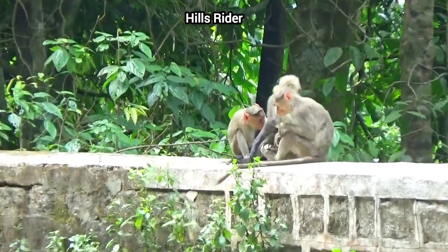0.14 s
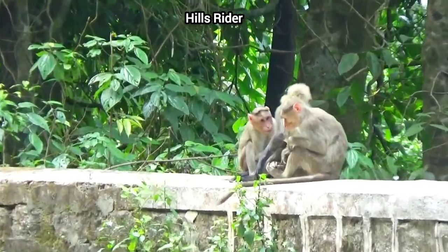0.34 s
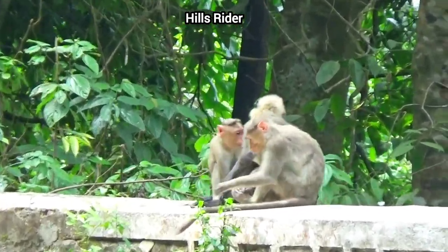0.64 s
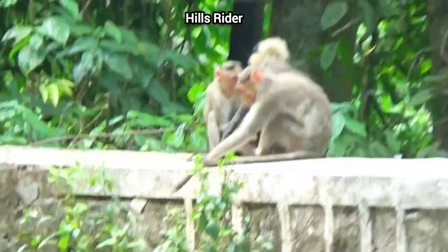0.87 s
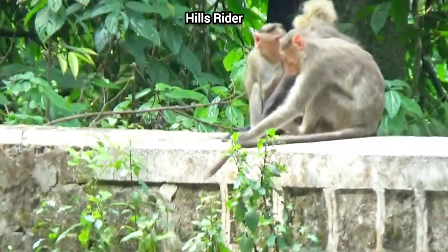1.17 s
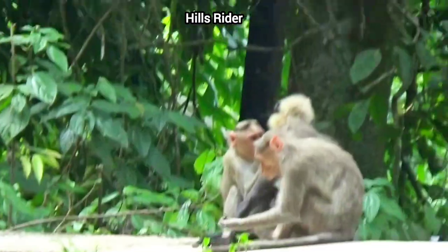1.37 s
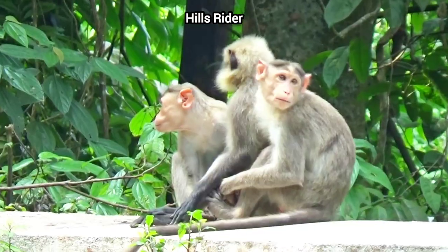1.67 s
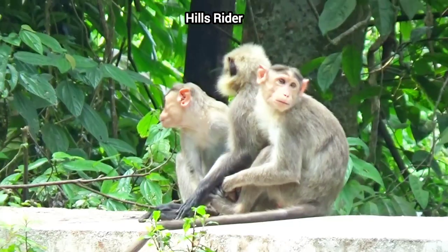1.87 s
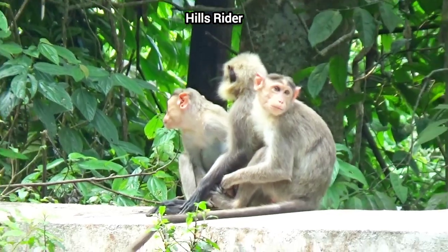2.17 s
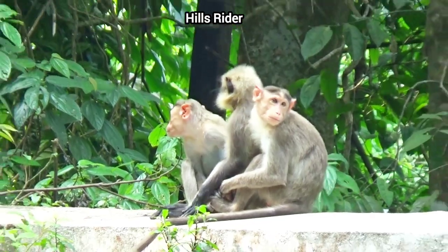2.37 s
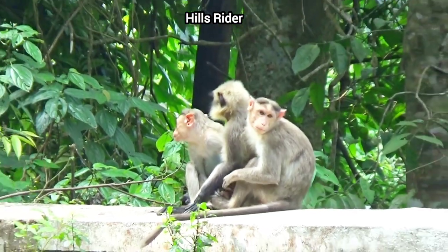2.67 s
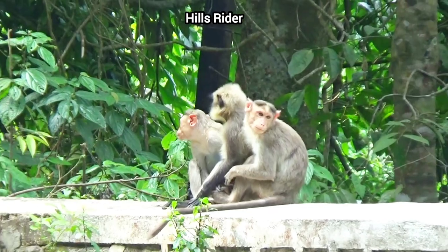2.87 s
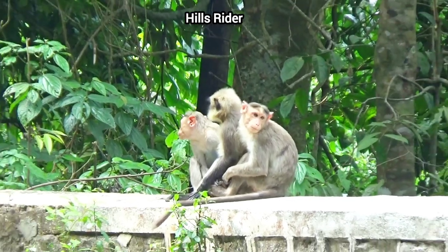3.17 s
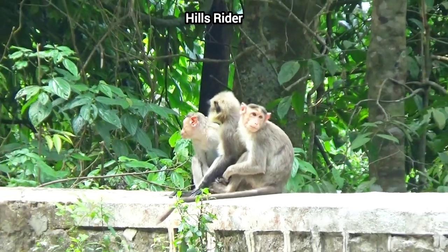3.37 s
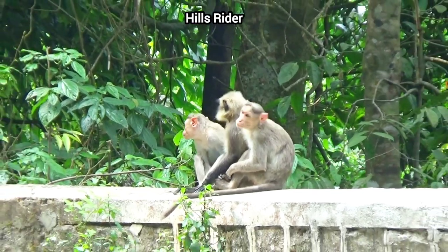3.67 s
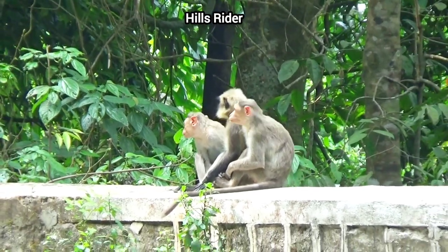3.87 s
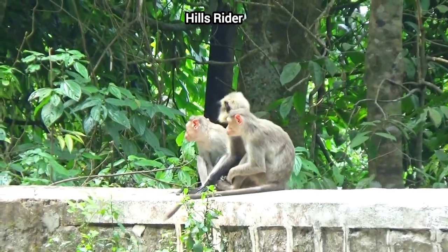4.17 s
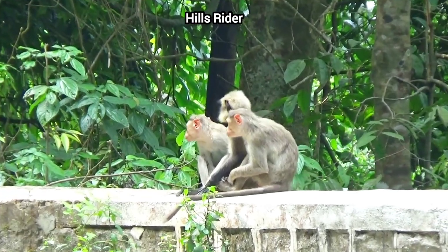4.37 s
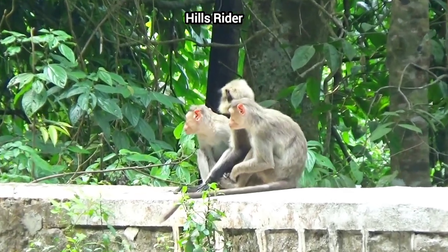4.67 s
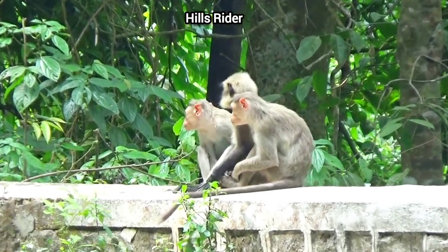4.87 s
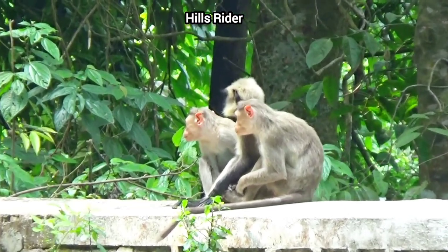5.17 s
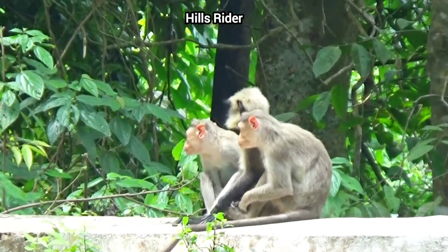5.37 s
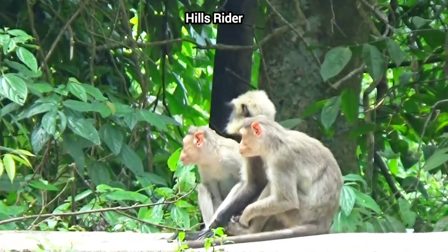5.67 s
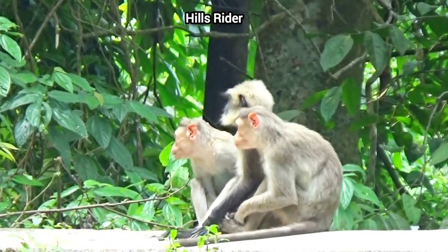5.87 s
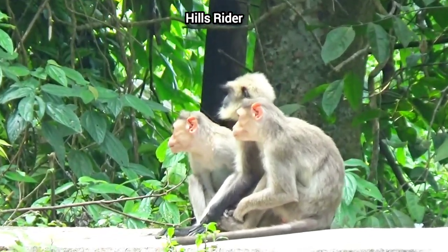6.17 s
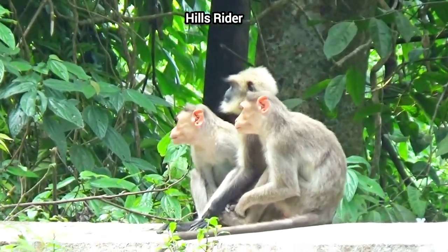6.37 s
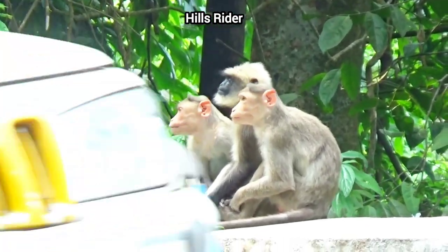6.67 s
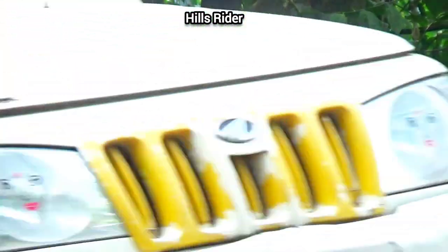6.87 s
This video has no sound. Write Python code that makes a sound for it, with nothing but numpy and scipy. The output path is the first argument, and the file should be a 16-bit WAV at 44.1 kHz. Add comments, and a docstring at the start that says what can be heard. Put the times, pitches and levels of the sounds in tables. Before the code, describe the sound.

Small ticks and rustles, then a loud raspy vehicle horn echoing off trees, faint distant blasts, and a rattling diesel engine growing until very near.

```python
"""A diesel pickup rolls slowly down a wooded hill road towards the listener and holds its twin horn once.
The horn is a stack of buzzing partials with a rasp of noise; delayed copies come back off trees and a wall,
lower in pitch from behind the moving truck. The engine is tones and noise that follow its firing rate.
A second vehicle further off gives two blasts, made of one steadier path and many echoes.
Close by, short rings and clicks make ticks and rustles, over a faint hiss of leaves and far road."""
import sys
import numpy as np
from scipy import signal
from scipy.io import wavfile

SR = 44100
rng = np.random.default_rng(int(sys.argv[2]) if len(sys.argv) > 2 else 0)


def transcribe(signal):
    """Save signal, clipped to [-1, 1], as a 16-bit WAV file at the path in sys.argv[1]."""
    frames = np.atleast_2d(signal).T
    limited = np.clip(frames, -1, 1)
    pcm = np.round(limited * 32767).astype(np.int16)
    wavfile.write(sys.argv[1], SR, pcm)


N = 309582
T = np.arange(N) / SR   # time in seconds
CUTOFF_HZ = 16300

# How much wider than central the noises are. Each row: frequency in Hz, side minus mid in dB.
SIDE_MINUS_MID = [(60, -13), (1000, -59), (4000, -23), (6500, -22), (9000, -13), (12000, 9)]

# Leaves and far road. Each row: frequency in Hz, relative level in dB per Hz.
WOOD_SPECTRUM = [(180, 14.5), (300, -15), (478, -19.5), (701, 25), (787, 5.5), (3300, -12), (4200, -11),
                 (8500, -14), (12000, -38), (16000, -41)]
WOOD_DB = -52.5
# A faint insect: pitch, middle of its moment, half length and level.
INSECT_HZ, INSECT_S, INSECT_WIDTH_S, INSECT_DB = 6700, 0.87, 0.29, -66.5

# Rustles close by. Each row: middle in seconds, half length in seconds, level in dB.
RUSTLES = [(0.05, 0.044, -54), (0.15, 0.034, -53), (0.226, 0.015, -67), (.56, 0.026, -58),
           (.65, 0.045, -51.5), (.94, .03, -62), (1.435, 0.025, -52)]
RUSTLE_PER_S, RUSTLE_HZ, RUSTLE_WIDTH_HZ = 770, 1500, 430
# Ticks close by. Each row: start in seconds, level in dB, ring in Hz, share of bright crack from 0 to 1.
TICKS = [(0.114, -35.5, 1400, 0.2), (0.1326, -34, 1490, 0.2), (0.1494, -39, 1770, 0.1),
         (0.19, -34.5, 1260, 0.4), (0.2245, -42, 1500, 0.4), (0.236, -23.5, 1410, 0.15),
         (0.6003, -37, 1360, 0.8), (0.6235, -37, 1600, 0.8), (0.6297, -36, 1660, 0.7),
         (0.6667, -33, 1500, 0), (0.691, -32.5, 1600, 0.1), (0.9397, -34.5, 1400, 0),
         (1.448, -24, 1710, 0.4), (2.209, -28, 1620, 0), (2.431, -23, 1580, 0.2), (3.455, -31.5, 1500, 0.1)]
TICK_WIDTH_HZ = 1000
CRACK_S = .0015   # how fast the crack dies away

# Blasts of the other vehicle. Each row: start in seconds, end in seconds, level in dB.
FAR_BLASTS = [(2.697, 3.183, -64), (3.749, 4.492, -64.5)]
# Its two notes, by pitch in Hz. Each row of a note: partial number, relative level in dB.
FAR_HORN = {495: [(1, 9), (2, 3.5), (3, 2.5), (4, 2), (5, -4), (6, -2.5)], 592: [(1, 4), (2, 1.5), (3, 6),
            (4, -1), (5, -13), (6, -8)]}
FAR_DIRECT_DB = 5   # the straightest path over one echo
FAR_SWELL = .5   # width of each blast's swell, as a share of its length
FAR_M_PER_S, FAR_BEHIND_DB = 7.0, -7

# Revs sink while coasting; the throttle lifts them twice. Each row: time in seconds, firings per second.
FIRING_RATE = [(0, 53.8), (1.4, 52.3), (2.7, 45.2), (4.3, 39.5), (4.63, 38.3), (4.85, 42.5), (5.4, 42.8),
               (5.55, 50), (6.1, 46.8), (7.02, 43)]
# Tone at the firing rate itself. Each row: time in seconds, level in dB.
FIRING_TONE = [(0, -72), (.4, -55.5), (.82, -68), (1.4, -57), (1.95, -73.5), (2.8, -61), (4.3, -52),
               (4.68, -58), (5.4, -56), (5.62, -45), (6.05, -57), (6.7, -51), (7.02, -49.5)]
# Higher engine tones. Each row: multiple of the firing rate, dB over the rumble before the pipe's lift.
EXHAUST = [(2, -13.5), (3, -15), (4, -10), (5, -10), (6, -11), (7, -20), (8, -20)]
# The exhaust pipe lifts tones that fall on it. Each row: frequency in Hz, width in Hz, lift in dB.
PIPE = [(110.7, 10, 11), (322, 16, 10), (198.3, 18, 5.5)]
# The engine pulls, then eases, and the pipe hums less. Each row: time in seconds, share of the lift.
PULL = [(0, 1.3), (.66, 1.03), (.76, 0.69), (2.5, 0.64)]
# How near the truck sounds. Each row: time in seconds, level of its clatter in dB.
APPROACH = [(0, -54), (1.0, -51.5), (2.5, -47.5), (3.5, -46.5), (4.099, -45), (4.6, -44.5), (5.1, -42.5),
            (5.5, -40), (5.7, -38.5), (5.9, -35.5), (6.15, -35.5), (6.4, -36.5), (7.02, -35)]
# Engine, tyres and fan. Each row: frequency in Hz, relative level in dB per Hz.
TRUCK_SPECTRUM = [(28, -13), (42, -20), (65, -13), (100, -12.5), (168, 2.5), (330, -2), (427, -7),
                  (621, -10), (1100, -12.5), (1370, -12.5), (1700, -10.5), (2420, -17), (2800, -15),
                  (3600, -26.5), (4600, -25.5), (5860, -22.5), (8710, 13), (11000, -17), (13500, -17),
                  (16000, -15)]
# Bass leans further left. Each row: frequency in Hz, left minus right in dB.
LEAN = [(60, 9.5), (200, 2.5), (1000, 0.6), (4000, 0.5), (10000, 0.5)]
# Body resonances. Each row: frequency in Hz, width in Hz, dB over the clatter, seconds when it faces us.
PANELS = [(336, 50, -4.5, 5.46), (633, 180, -13, 5.5), (796, 65, -25, 4.4), (1556, 100, -14, 6.4),
          (1923, 56, -22, 5.4), (2050, 140, -19.5, 5.4), (3150, 670, -18.5, 6), (3720, 580, -18, 6.0),
          (4520, 1300, -29, 5.6)]
PANEL_TURN_S, PANEL_HIDDEN_DB = .2, -6.5
# Level when nearest, and the share of the approach's swing that each noise follows.
RUMBLE_NEAR_DB, RUMBLE_FOLLOWS = -37.5, 0.75
HISS_NEAR_DB, HISS_FOLLOWS = -43.5, 1.35
SURGE_DB = 1.6   # the rumble surges band by band
PAN_NEAR_DB, PAN_PER_DB = -0.53, 0.0467   # left minus right when nearest; further left the further off
# A low thud as the gear changes.
THUD_S, THUD_HZ, THUD_DB, THUD_WIDTH_S = 4.5, 72.6, -47, 0.052

# Pitch of the low horn. Each row: time in seconds, fundamental in Hz.
LOW_HORN_HZ = [(1.53, 328.3), (2, 327.6), (3.2, 327.2)]
# The low horn as it arrives. Each row: time in seconds, level in dB of the fundamental, then of the
# 6th, 7th, 8th, 10th and 11th partial, then the shared curve of all other partials.
LOW_HORN_LEVELS = [(1.56, -37.5, -54, -26.5, -51, -32, -28.5, -26.5),
                   (1.59, -34.5, -37, -25.5, -44, -36, -28.5, -30),
                   (1.664, -34, -65, -23, -53, -28.5, -29, -29.5),
                   (1.726, -35.5, -36, -19.5, -44, -27.5, -25, -30.5),
                   (1.79, -33, -57, -26, -59, -32, -30.5, -29.5),
                   (1.876, -42.5, -48, -20.5, -39, -27.5, -27.5, -30),
                   (2.118, -35.5, -42.5, -46, -37, -33, -28, -28),
                   (2.186, -38.5, -41, -43, -28.5, -38, -35, -29.5),
                   (2.386, -33.5, -49, -38.5, -40, -31, -31, -26.5),
                   (2.74, -32.5, -40, -25, -33, -30.5, -28, -26),
                   (2.834, -31, -49, -26.5, -33, -25, -28, -27.5),
                   (2.916, -29, -34.5, -31, -38, -28.5, -28.5, -25.5),
                   (3.152, -29, -39, -47, -34, -26, -29.5, -27.5),
                   (3.19, -28.5, -57, -30, -32, -33, -28.5, -23.5)]
# The low horn's tone colour. Each row: partial number, relative level in dB.
LOW_HORN = [(1, -3.5), (2, -21), (4, -28), (5, -14), (6, -17), (7, -0.5), (8, -5.5), (9, -8), (10, -0.5),
            (11, 1.5), (12, -13), (13, -22.5), (14, -20.5), (15, -19), (16, -12), (17, -19), (18, -9.5),
            (19, -20.5), (20, -15), (21, -19), (22, -18.5), (23, -22.5), (24, -20.5), (25, -32),
            (26, -17.5), (27, -28), (28, -18), (29, -29), (30, -24.5)]
# The weak high horn. Each row: partial number, level in dB.
HIGH_HORN = [(1, -48.5), (5, -60), (7, -68), (9, -58), (10, -53)]
HIGH_HORN_HZ = 389.3
# Rattle of the contacts. Each row: frequency in Hz, relative level in dB per Hz.
RASP = [(600, -12), (1500, 6.5), (2300, 4.5), (3500, 14.5), (4300, -5.5), (8000, -7.5), (11000, -24),
        (16000, -9)]
# What trunks, leaves and wall return. Each row: frequency in Hz, gain in dB.
THROWN_BACK = [(390, -12), (660, -9), (1600, -1.5), (2300, -1), (2900, -5.5), (3600, -7), (5000, -6),
               (6500, -4), (10000, -3)]
HORN_ON_S, HORN_OFF_S, HORN_PAN_DB = 1.534, 3.2, 2
OTHERS_UNDER_DB = -2.5   # the other partials lie under their shared curve
# Partials fade by chance, those with a level curve of their own less so.
FADE_DB, TRACKED_FADE_DB, FADE_PER_S = 2.5, .8, 6.8
# Partials over 4.5 kHz start under their level and sink while the horn is held.
TREBLE_LATE_DB, TREBLE_LOSS_DB_PER_S = 10, 6.5
# The diaphragm rings on.
RING_HZ, RING_DB, RING_HOLD_S, RING_FALL_DB_PER_S = 315, -31, 0.11, 326
FIRST_STRIKE_DB, RASP_DB, RASP_FALL_S = -19.5, -41.5, .22
# Echo gains: the low horn's own, the high horn's own, then both together.
LOW_ECHO_DB, HIGH_ECHO_DB, ECHO_DB = -28, 20, -9.5
TRUCK_M_PER_S, BEHIND_DB, ECHO_T60_S = 8.0, -14.5, 1.81
LEAF_DB_PER_KHZ_S = 9.5   # longer paths through the leaves come back duller


def amp(db):
    """Turn dB into gain."""
    return 10 ** (np.asarray(db) / 20)


def rms_one(x):
    """Scale to an average strength (rms) of 1."""
    return x / np.sqrt(np.mean(x ** 2) + 1e-20)


def in_time(rows, t=T):
    """Read each column of a curve at times t."""
    s, *columns = np.transpose(rows)
    return [np.interp(t, s, c) for c in columns]


def at_hz(points, hz):
    """Read a spectrum on a log frequency axis."""
    point_hz, value = np.array(points).T
    return np.interp(np.log(hz), np.log(point_hz), value)


def bump(x, middle, width):
    """Bell-shaped rise and fall, 1 on top."""
    return np.exp(-((x - middle) / width) ** 2)


def gate(t, on, off, rise=0.00082, fall=0.007):
    """Straight attack, hold and release."""
    attack = np.clip((t - on) / rise, 0, 1)
    return attack * np.clip((off - t) / fall + 1, 0, 1)


def drift(rate, size=N):
    """Slow chance, about rate turns a second, with spread 1."""
    r = np.exp(-80 * np.pi * rate / SR)
    # One value per 40 samples; the first 1000 let the filter settle.
    slow = signal.lfilter([1], [1, -2 * r, r * r], rng.standard_normal(N // 40 + 1002))[1000:]
    return np.interp(np.arange(size) / 40, np.arange(len(slow)), rms_one(slow))


def resonance(x, hz, width_hz):
    """Two-pole peak, gain 1 on top."""
    r = np.exp(-np.pi * width_hz / SR)
    top = np.array([1, 0, -1]) * (1 - r * r) / 2
    return signal.lfilter(top, [1, -2 * r * np.cos(2 * np.pi * hz / SR), r * r], x)


def pan(x, db):
    """Make left louder than right by db."""
    return x * amp(np.multiply.outer([.5, -.5], db * np.ones(N)))


def bands(spectrum, count, size=N):
    """Split 28 Hz to 18 kHz into count bands of stereo noise; give (centre Hz, band) pairs."""
    edges = np.geomspace(28, 18000, count + 1)
    white = rng.standard_normal((2, 2, size))   # neighbouring bands use different noise
    for k, (low, high) in enumerate(zip(edges, edges[1:])):
        hz = np.sqrt(low * high)
        if hz > spectrum[0][0]:
            band_filter = signal.butter(2, [low, high], "band", fs=SR, output="sos")
            mid, side = signal.sosfilt(band_filter, white[k % 2])
            stereo = mid + amp(at_hz(SIDE_MINUS_MID, hz)) * side * [[1], [-1]]
            yield hz, amp(at_hz(spectrum, hz)) * stereo


def one_cycle(partials, scatter_db):
    """One cycle of a wave of these partials, coloured by chance as one path colours it."""
    k, db = np.transpose(partials)
    size = np.sqrt(2) * amp(db + scatter_db * rng.standard_normal(len(k)))
    turns = np.outer(np.round(k), np.arange(2048) / 2048) + rng.random((len(k), 1))
    return size @ np.sin(2 * np.pi * turns)


def play(cycle, t, hz):
    """Repeat a stored cycle hz times a second along the times t."""
    return cycle[(t * hz % 1 * 2048).astype(int)]


def echoes(hz, partials, on, off, speed, behind_db, count, rise=0.018, fall=0.042):
    """Paths off trees and walls lengthen as the source moves: those behind it sound up to 2 v / c lower."""
    out = np.zeros((2, N))
    span = slice(int(on * SR), int((off + 0.7) * SR))
    t = T[span]
    for k, (late, angle) in enumerate(rng.random((count, 2))):
        delay = .01 + .45 * late ** 1.8
        behind = ((k + angle) / count) ** 1.5   # 0 is ahead of the source, 1 is behind it
        wander = .00012 * drift(4, size=len(t))   # each path shifts from tree to tree
        sent = on + (t - on - delay) * (1 - 2 * speed / 343 * behind) - wander
        duller = [(m, db - LEAF_DB_PER_KHZ_S * m * hz / 1000 * delay) for m, db in partials]
        wave = play(one_cycle(duller, scatter_db=2.5), sent, hz)
        flicker_db = 3.7 * drift(9.4, size=len(t))
        level = amp(behind_db * behind - 60 * delay / ECHO_T60_S + flicker_db)
        side = amp(3.2 * rng.standard_normal() * np.array([[.5], [-.5]]))
        attack = gate(t - delay, on, off + 1, rise + 0.28 * delay)
        release = np.exp(-np.maximum(t - delay - off, 0) / (fall + 0.11 * delay))
        out[:, span] += wave * level * attack * release * side
    return out


def thrown_back(partials, hz):
    """Colour the partials as the roadside does: it returns some pitches better than others."""
    return [(k, db + at_hz(THROWN_BACK, k * hz)) for k, db in partials]


def wood():
    """A steady faint hiss of shaped noise, and for a moment an insect: noise through a narrow peak."""
    hiss = rms_one(sum(band for _, band in bands(WOOD_SPECTRUM, count=12)))
    insect = resonance(resonance(rng.standard_normal(N), INSECT_HZ, 500), INSECT_HZ, 500)
    moment = bump(T, INSECT_S, INSECT_WIDTH_S)
    return amp(WOOD_DB) * hiss + amp(INSECT_DB) * moment * rms_one(insect)


def rustle():
    """Loose runs of tiny uneven clicks around the ticks, each exciting a short ring."""
    happens = rng.random(N) < RUSTLE_PER_S / SR
    size = amp(2.1 * np.minimum(rng.exponential(1, N), 4))
    clicks = happens * size * rng.choice([-1, 1], N)
    level = sum(amp(db) * bump(T, s, half) for s, half, db in RUSTLES)
    return level * rms_one(resonance(clicks, RUSTLE_HZ, RUSTLE_WIDTH_HZ))


def ticks():
    """Each tick is a bright crack and a short ring that rattles on for a few ms; rustles join in."""
    out = np.zeros(N)
    t = np.arange(SR // 40) / SR
    noises = rng.standard_normal((len(TICKS), len(t)))
    for (s, db, hz, crack), noise in zip(TICKS, noises):
        hit = (t == 0) + 0.5 * noise * np.exp(-t / 0.0023)
        ring = resonance(resonance(hit, hz, TICK_WIDTH_HZ), hz, TICK_WIDTH_HZ)
        snap = resonance(noise[::-1] * np.exp(-t / CRACK_S), 4800, 5700)
        crack = np.clip(crack, 0, 1)
        sound = (1 - crack) * ring / np.abs(ring).max() + crack * snap / np.abs(snap).max()
        start = round(s * SR)
        out[start:start + len(t)] += amp(db) * sound
    return pan(out + rustle(), 1.0)


def far_horn():
    """The other vehicle is round the bend: one steadier path and many echoes arrive."""
    out = np.zeros((2, N))
    for on, off, db in FAR_BLASTS:
        swell = bump(T, (on + off) / 2 + 0.065, FAR_SWELL * (off - on))
        for hz, partials in FAR_HORN.items():
            back = echoes(hz, partials, on, off, FAR_M_PER_S, FAR_BEHIND_DB, count=18, rise=0.05, fall=0.085)
            direct = play(one_cycle(partials, scatter_db=0.9), T, hz)
            direct = direct * amp(FAR_DIRECT_DB + 2.4 * drift(3.3)) * gate(T, on, off, rise=0.073, fall=0.16)
            out += amp(db) * swell * (back + direct)
    return out


def engine_tones(cycles, per_s, rumble_db):
    """Tones at multiples of the firing rate, lifted where the pipe resonates, and the gear-change thud."""
    (tone_db,), (pull,) = in_time(FIRING_TONE), in_time(PULL)
    tones = amp(tone_db) * np.sin(2 * np.pi * cycles)
    tones += amp(THUD_DB) * bump(T, THUD_S, THUD_WIDTH_S) * np.sin(2 * np.pi * THUD_HZ * T)
    for k, db in EXHAUST:
        lift_db = pull * sum(top_db * bump(k * per_s, hz, width) for hz, width, top_db in PIPE)
        level = amp(rumble_db + db + lift_db + 1.4 * drift(2.9))
        tones += level * np.sin(2 * np.pi * (k * cycles + rng.random()))
    return tones


def body_panels(clatter):
    """Body panels resonate with the clatter and sound stronger once they turn to face the listener."""
    out = np.zeros((2, N))
    for hz, width, db, faces_s in PANELS:
        hidden = np.clip((faces_s - T) / PANEL_TURN_S, 0, 1)
        ringing = resonance(resonance(clatter, hz, width), hz, 2 * width)
        out += amp(db + PANEL_HIDDEN_DB * hidden) * rms_one(ringing)
    return out


def truck():
    """Exhaust tones on the firing rate; rumble, clatter and hiss throb with each firing."""
    (per_s,), (clatter_db,) = in_time(FIRING_RATE), in_time(APPROACH)
    far_db = clatter_db - clatter_db.max()   # 0 when nearest
    rumble_db = RUMBLE_NEAR_DB + RUMBLE_FOLLOWS * far_db
    hiss_db = HISS_NEAR_DB + HISS_FOLLOWS * far_db
    cycles = np.cumsum(per_s) / SR
    tones = engine_tones(cycles, per_s, rumble_db)
    # The noise swells at each firing.
    knock = (1 + np.cos(2 * np.pi * cycles)) ** 2 / 4 * amp(3.6 * drift(4.7))
    parts = np.zeros((3, 2, N))   # rumble, clatter, hiss
    for hz, band in bands(TRUCK_SPECTRUM, count=27):
        flutter_db = 0.79 * drift(28) + (hz < 420) * SURGE_DB * drift(2.7)
        parts[int(hz > 420) + int(hz > 5500)] += pan(band, at_hz(LEAN, hz)) * amp(flutter_db)
    rumble, clatter, hiss = map(rms_one, parts)
    # The bodywork stands out more from near.
    clatter = clatter + amp(0.12 * far_db) * body_panels(clatter)
    noise = amp(rumble_db) * rumble * (1 + 0.28 * knock)
    noise += amp(clatter_db) * clatter * (1 + 0.14 * knock)
    noise += amp(hiss_db) * hiss * (1 + 0.39 * knock)
    return pan(pan(np.sqrt(2) * tones, 0.46) + noise, PAN_NEAR_DB - PAN_PER_DB * far_db)


def low_horn(t, hz, held):
    """A buzzing diaphragm gives many partials; its fundamental rings on after the switch opens."""
    *tracked_db, others_db = in_time(LOW_HORN_LEVELS, t)
    tracked = dict(zip([1, 6, 7, 8, 10, 11], tracked_db))
    # The pitch glides to that of the free ring at the end.
    glide = gate(t, HORN_OFF_S - .01, 9, rise=0.028)
    cycles = np.cumsum(hz + (RING_HZ - hz) * glide) / SR
    since_on = t - HORN_ON_S
    treble_db = TREBLE_LOSS_DB_PER_S * since_on + TREBLE_LATE_DB * np.exp(-since_on / 0.022)
    near = np.zeros(len(t))
    for k, colour_db in LOW_HORN:
        db = tracked.get(k, others_db + OTHERS_UNDER_DB + colour_db)
        fade_db = min(k - 1, TRACKED_FADE_DB if k in tracked else FADE_DB)
        db = db + fade_db * drift(FADE_PER_S, size=len(t)) - (k > 13) * treble_db
        tone = np.sin(2 * np.pi * (k * cycles + rng.random()))
        near += held * amp(db) * tone
        if k == 1:
            fundamental = tone
    ring_db = RING_DB - RING_FALL_DB_PER_S * np.maximum(t - HORN_OFF_S - RING_HOLD_S, 0)
    return near + (1 - held) * (t > HORN_OFF_S - .1) * amp(ring_db) * fundamental


def high_horn(t, held):
    """The weak upper diaphragm: a few partials of one steady pitch, each wavering in level."""
    near = np.zeros(len(t))
    for k, db in HIGH_HORN:
        level = amp(db + min(k, 3.0) * drift(5.7, size=len(t)))
        near += held * level * np.sin(2 * np.pi * (k * HIGH_HORN_HZ * t + rng.random()))
    return near


def horn_rasp(t):
    """Noise of the rattling contacts, with a clack of the armature before the buzz builds up."""
    rasp = rms_one(sum(band for _, band in bands(RASP, count=20, size=len(t))))
    strike = amp(FIRST_STRIKE_DB) * np.exp(-(t - t[0]) / 0.0025)
    return rasp * (strike + amp(RASP_DB) * gate(t, HORN_ON_S, HORN_OFF_S, fall=RASP_FALL_S))


def horn_echoes(low_hz):
    """Both notes come back from the roadside along many delayed paths."""
    blast = (HORN_ON_S, HORN_OFF_S, TRUCK_M_PER_S, BEHIND_DB)
    low = echoes(low_hz, thrown_back(LOW_HORN, low_hz), *blast, count=32)
    high = echoes(HIGH_HORN_HZ, thrown_back(HIGH_HORN, HIGH_HORN_HZ), *blast, count=10)
    return amp(ECHO_DB) * (amp(LOW_ECHO_DB) * low + amp(HIGH_ECHO_DB) * high)


def horn():
    """Two buzzing diaphragms a minor third apart, the upper one weak, with their rasp and echoes."""
    span = slice(round(HORN_ON_S * SR), round((HORN_OFF_S + .5) * SR))
    t = T[span]
    (hz,) = in_time(LOW_HORN_HZ, t)
    held = gate(t, HORN_ON_S, HORN_OFF_S, rise=0.016, fall=0.013)
    near = low_horn(t, hz, held) + high_horn(t, held)
    out = horn_echoes(hz.mean())
    out[:, span] += np.sqrt(2) * near + horn_rasp(t)
    return pan(out, HORN_PAN_DB)


def scene():
    """Everything at the roadside."""
    return wood() + ticks() + far_horn() + truck() + horn()


def record(dry):
    """Cut the top: a steep filter removes what lies above the cutoff."""
    return signal.sosfilt(signal.cheby2(18, 70, CUTOFF_HZ, fs=SR, output="sos"), dry)


dry = scene()
out = record(dry)
transcribe(out)
```